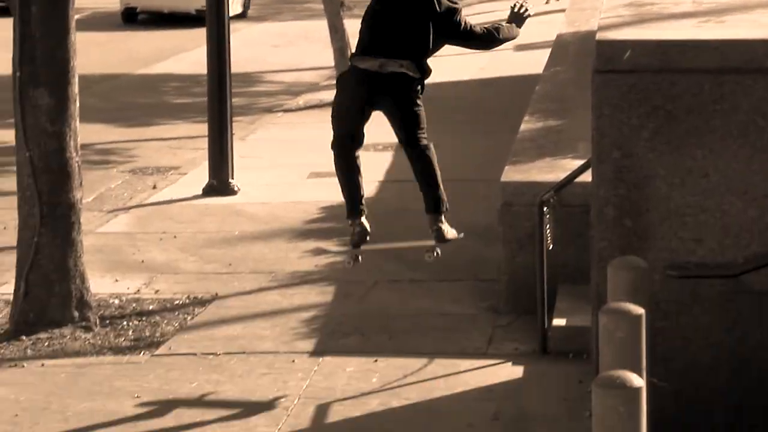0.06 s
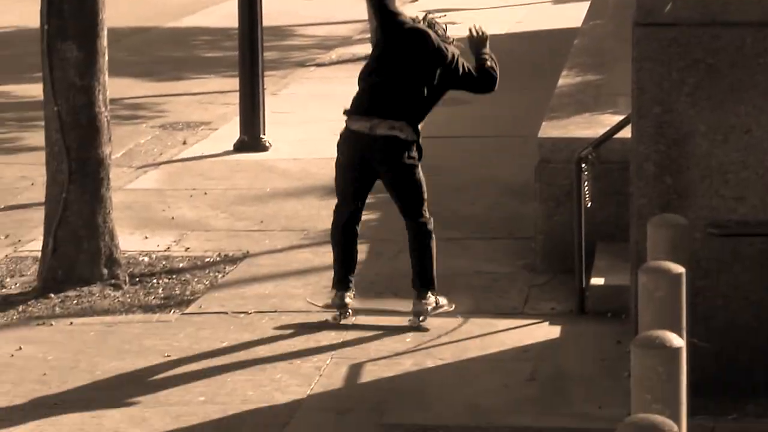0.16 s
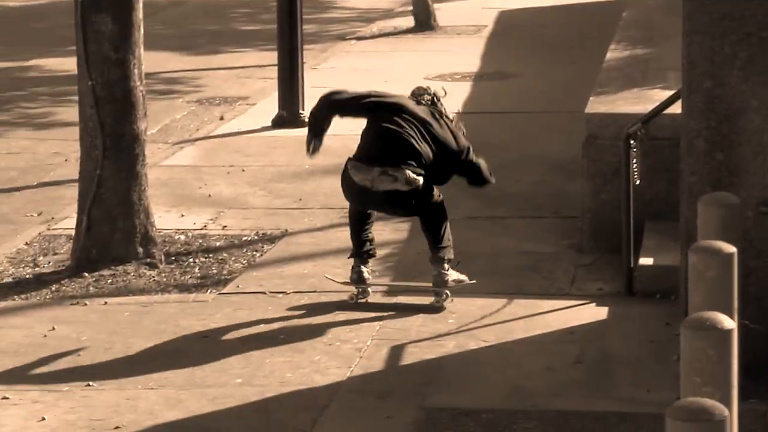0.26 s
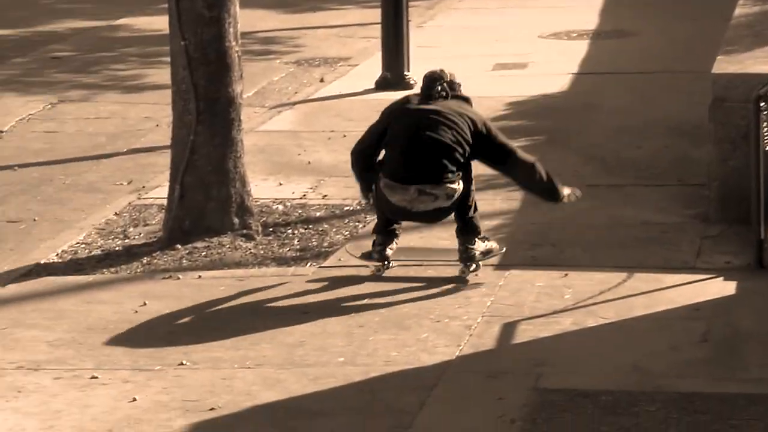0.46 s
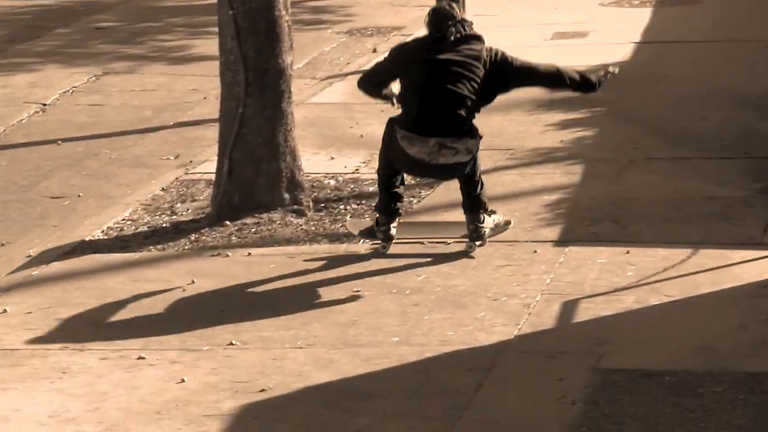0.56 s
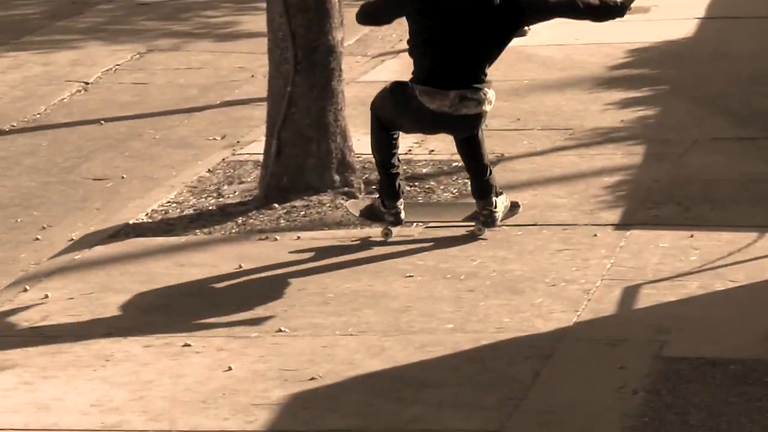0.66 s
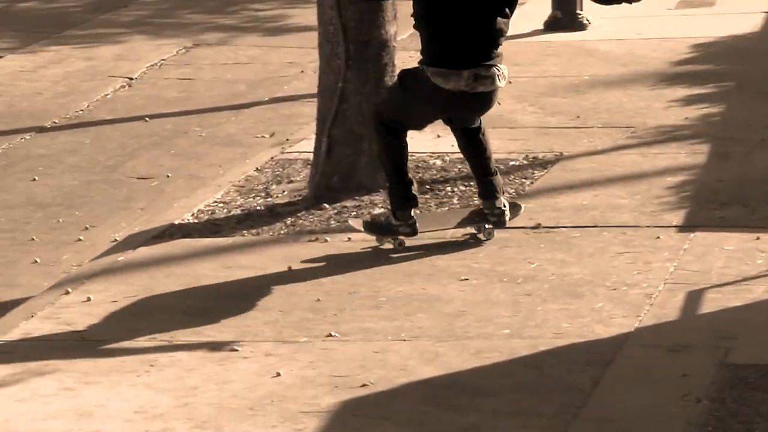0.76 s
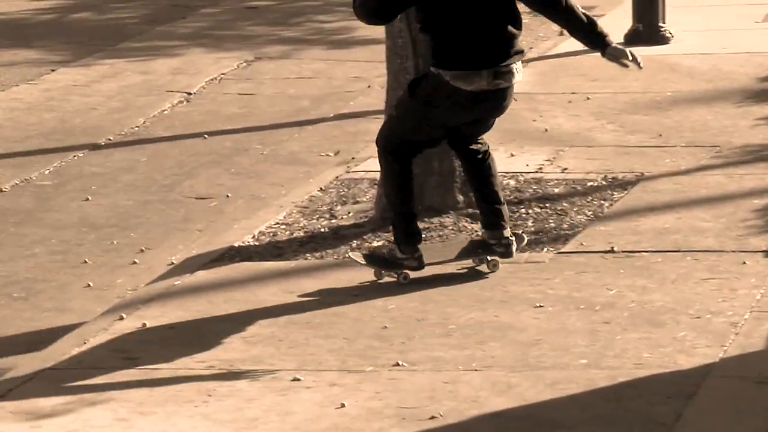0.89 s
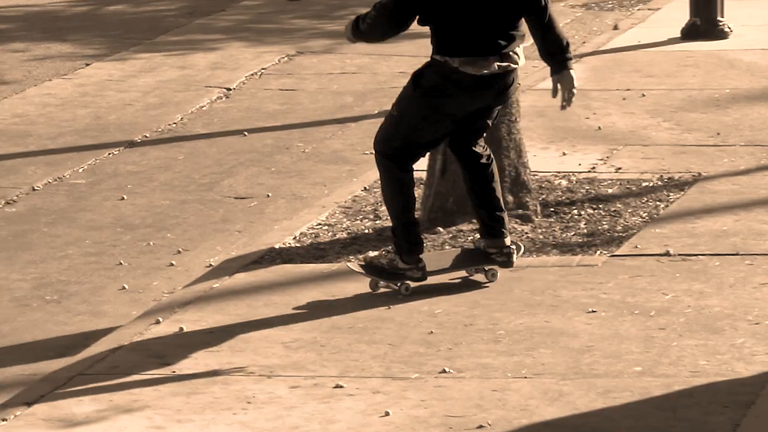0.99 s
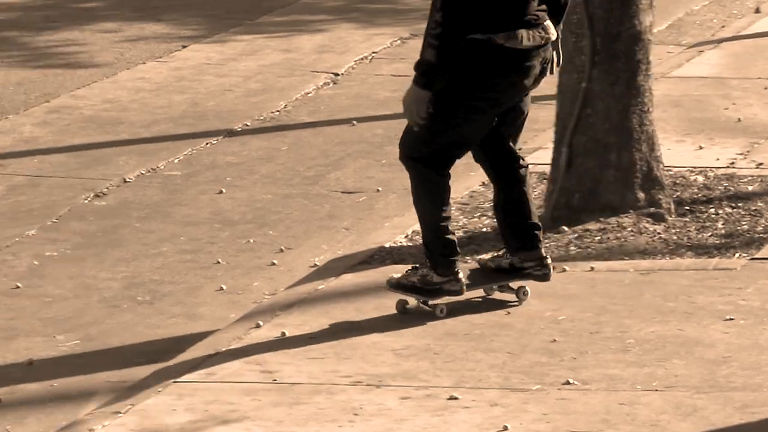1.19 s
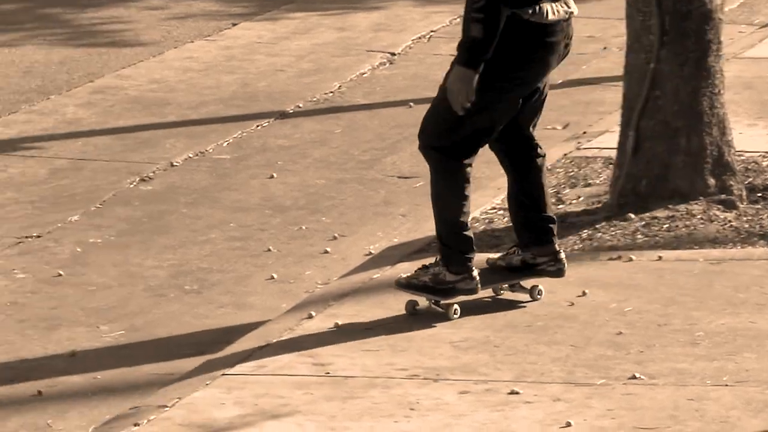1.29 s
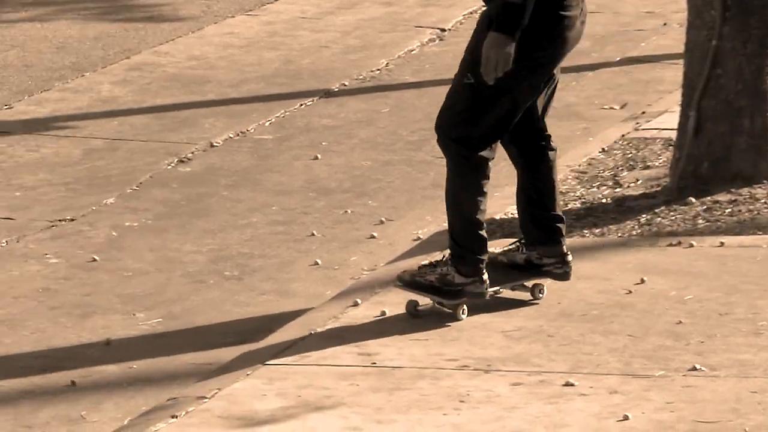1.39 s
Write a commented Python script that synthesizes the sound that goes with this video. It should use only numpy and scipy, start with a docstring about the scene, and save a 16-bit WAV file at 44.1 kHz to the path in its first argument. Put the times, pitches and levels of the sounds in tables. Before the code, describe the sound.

A skateboard landing on stone pavement: after a quarter second of dull distant traffic, wheels, trucks and shoes hit the wooden deck in a loud rattling clack at 0.24-0.29 seconds. Ground and house fronts throw back a short scattered echo. Wheels scrub roughly, strongest near 0.39, then roll on low and soft, with faint metal ticks and a small knock near 0.88. Faint microphone hiss stays throughout.

```python
"""Skateboard landing on a stone pavement

Stereo pair in a street. Wheels, trucks and shoes strike the wooden deck within fifty milliseconds: short pushes
into ringing modes, with cracks of noise and small metal ticks. Ledge, ground and house fronts throw back
decaying noise as an echo. The wheels scrub in dense ringing grains and the board rolls on as flickering noise,
ticking and knocking once, over distant traffic and microphone hiss, both banded noise."""
import sys
import numpy as np
from scipy import signal
from scipy.fft import rfft, irfft, next_fast_len
from scipy.io import wavfile

SR = 44100
rng = np.random.default_rng(int(sys.argv[2]) if len(sys.argv) > 2 else 0)


def unload_audio(sound):
    """Save the sound as a 16-bit wav file, at the path given as the first command line argument."""
    columns = np.transpose(np.atleast_2d(sound))
    # keep every value between -1 and 1, then stretch to whole-number steps
    steps = np.round(np.clip(columns, -1, 1) * 32767)
    wavfile.write(sys.argv[1], SR, steps.astype(np.int16))


def voltage_ratio(level):
    """Linear amplitude factor for a level in decibels (scalar or array-like)."""
    return 10 ** (np.asarray(level, float) / 20)


N = 63945


def rms_one(x):
    """Scale to rms 1."""
    return x / np.sqrt(np.mean(x ** 2) + 1e-20)


def at_hz(points, hz):
    """Read a table's second column on a log-frequency axis."""
    table_hz, values = np.transpose(points)
    return np.interp(np.log(hz), np.log(table_hz), values)


def filtered(x, order, hz, kind="low"):
    """Butterworth filter: a lowpass, or a band between two frequencies."""
    return signal.sosfilt(signal.butter(order, hz, kind, fs=SR, output="sos"), x)


def drift(rate_hz):
    """Slow chance with spread 1: noise through two equal lowpass poles, made at a fortieth of the sample rate."""
    pole = np.exp(-2 * np.pi * rate_hz * 40 / SR)
    chance = rng.standard_normal(N // 40 + 2002)
    slow = signal.lfilter([1], [1, -2 * pole, pole * pole], chance)[2000:]  # settled part
    return np.interp(np.arange(N) / 40, np.arange(len(slow)), rms_one(slow))


def ring(clicks, hz, t60):
    """A damped resonance: each unit click starts a sine of height 1 that falls 60 dB in t60 seconds."""
    radius = voltage_ratio(-60 / (t60 * SR))
    angle = 2 * np.pi * hz / SR
    return signal.lfilter([0, np.sin(angle)], [1, -2 * radius * np.cos(angle), radius ** 2], clicks + 1e-18)


def fade(clicks, t60):
    """Exponential loss: each click starts an envelope that falls 60 dB in t60 seconds."""
    return signal.lfilter([1], [1, -voltage_ratio(-60 / (t60 * SR))], clicks + 1e-18)


# How alike the two microphones hear a diffuse sound.
# Each row: frequency in Hz, left-right correlation from 0 to 1.
LIKENESS = [(60, 1.0), (180, 1.0), (550, 0.99), (1650, 0.83), (4970, 0.08), (15000, 0.091)]


def stereo_bands():
    """Half-octave noise bands: a shared mid and an opposed side give the pair's left-right likeness."""
    edges = 20 * 2 ** np.arange(0, 10, 0.5)  # Hz
    white = rng.standard_normal((2, 2, N + 4000))
    for k, (low, high) in enumerate(zip(edges, edges[1:])):
        # Neighbouring bands use different noise; the filter's start is dropped.
        mid, side = filtered(white[k % 2], 2, [low, high], "band")[:, 4000:]
        centre = np.sqrt(low * high)
        alike = np.clip(at_hz(LIKENESS, centre), 0, 1)
        yield centre, np.sqrt(1 + alike) * mid + np.sqrt(1 - alike) * side * [[1], [-1]]


def noise(spectrum, patchy_db, rate_hz):
    """Coloured stereo noise at rms 1, its bands flickering partly together and mostly each alone."""
    together = drift(rate_hz)
    total = 0
    for hz, band in stereo_bands():
        flicker_db = patchy_db * (0.31 * together + drift(rate_hz))
        total = total + voltage_ratio(at_hz(spectrum, hz) + flicker_db) * band
    return rms_one(total)


# Distant traffic at the microphones.
# Each row: frequency in Hz, relative level in dB per Hz.
TRAFFIC = [(20, -5.5), (40, -3), (70, -1.5), (120, -3), (260, -3), (400, -9.5), (700, -10), (1000, -20.5),
           (1600, -21), (2500, -37.5), (3600, -75.5), (5000, -36), (9000, -103)]


def traffic():
    """Distant traffic: dark noise with a slight flicker in its bands."""
    return voltage_ratio(-35.5) * noise(TRAFFIC, patchy_db=0.5, rate_hz=8)


# Hiss of the microphones themselves.
# Each row: frequency in Hz, relative level in dB per Hz.
HISS = [(2060, -25), (3500, -14), (5080, -16.5), (15200, -12.5), (16100, -17), (16700, -48)]


def microphone_hiss():
    """Microphone hiss: faint, mostly high noise with slowly flickering bands."""
    return voltage_ratio(-72) * noise(HISS, patchy_db=0.8, rate_hz=3.8)


# Blows of wheels, trucks and shoes on the board, in the landing and one late knock.
# Each row: start in seconds, relative deck level in dB, contact in ms, relative crack level in dB,
# extra level of the low thump modes in dB.
BLOWS = [(.2400, -16, 1.35, -55, 6), (.2428, -14.5, 0.2, -28.5, -0.5), (0.2456, -2, 0.57, -18.5, -1.5),
         (.2470, -5, 0.52, -24, -3), (.2500, -20.5, 0.64, -38.5, -2.5), (.2543, -14.5, 0.31, -20, 8.5),
         (0.258, -24, 0.17, -37, 7), (0.262, -13, 0.62, -31, 2), (0.2648, -5.5, 0.56, -41.5, 2.5),
         (.2675, -9, 0.5, -29.5, 5.5), (.2710, -5.5, 0.44, -26, 0), (0.278, -14.5, 0.31, -37, 2),
         (.2875, -13.5, 0.33, -35, -1), (.8770, -21, 0.92, -43, -14)]
# Ringing modes of the wooden deck and the trucks.
# Each row: frequency in Hz, relative level in dB, time to fall 60 dB in seconds.
DECK = [(130, -6.5, 0.034), (206, -12, 0.33), (230, -4, 0.039), (541, -21, 0.05), (603, 0, .048),
        (704, -8, 0.045), (1008, -3.5, 0.028), (1140, -18.5, 0.046), (1487, -7.5, 0.056), (1922, -4, 0.02),
        (2380, -22, 0.031), (2816, -11.5, 0.049), (3180, -4.5, 0.03), (4430, -41, .02)]
# Colour of the crack that comes with each blow.
# Each row: frequency in Hz, relative level in dB per Hz.
CRACK = [(500, -11.5), (1000, -2), (1600, -3), (2500, -5), (3500, -13.5), (5000, -20), (6800, -14),
         (9000, -29), (14000, -41), (16500, -47), (19000, -75)]


def deck_modes():
    """Each blow is a smooth push into all modes; a longer contact feeds the high modes less."""
    MODE_SPREAD_DB, THUMP_BELOW_HZ = 1.5, 300
    RADIATES_FROM_HZ, DULL_ABOVE_HZ = 143, 2770
    out = np.zeros(N)
    spread_db = MODE_SPREAD_DB * rng.standard_normal((len(BLOWS), len(DECK)))
    for (hz, mode_db, t60), mode_spread_db in zip(DECK, spread_db.T):
        force = np.zeros(N)
        for (s, blow_db, contact_ms, _, thump_db), own_db in zip(BLOWS, mode_spread_db):
            start = int(s * SR)
            quarter_contact = contact_ms * SR / 4000  # samples
            age = (np.arange(400) + 1 - s * SR % 1) / quarter_contact
            push = age ** 2 * np.exp(-1.5 * age)
            level_db = blow_db + mode_db + own_db + thump_db * (hz < THUMP_BELOW_HZ)
            force[start:start + 400] -= voltage_ratio(level_db) * push / push.sum()
        out += ring(force, hz, t60)
    return filtered(out, 2, [RADIATES_FROM_HZ, DULL_ABOVE_HZ], "band")


def cracks():
    """Each blow also sets off a burst of noise, bright and short over a duller, longer tail."""
    SIDE_DB, BRIGHT_T60_S = -12.5, 0.018
    TAIL_DB, TAIL_T60_S, TAIL_CUT_HZ = -8.5, 0.086, 5600
    starts = np.zeros(N)
    for s, _, _, crack_db, _ in BLOWS:
        starts[int(s * SR)] = voltage_ratio(crack_db)
    starts = signal.lfilter([0.2], [1, -0.8], starts)  # softens the onsets
    first, second = noise(CRACK, patchy_db=0, rate_hz=10)
    bright = first + voltage_ratio(SIDE_DB) * second * [[1], [-1]]  # narrow stereo
    dull = filtered(bright, 2, TAIL_CUT_HZ)
    return fade(starts, BRIGHT_T60_S) * bright + voltage_ratio(TAIL_DB) * fade(starts, TAIL_T60_S) * dull


def board():
    """The struck board: ringing deck modes and the cracks of the same blows."""
    return deck_modes() + cracks()


# How long the house fronts keep each band alive.
# Each row: frequency in Hz, time to fall 60 dB in seconds.
FRONTS_T60 = [(100, 0.45), (600, 0.86), (2000, 1), (5000, 0.63), (12000, 0.15)]
# Colour of what the house fronts send back.
# Each row: frequency in Hz, relative level in dB.
FRONTS_COLOUR = [(100, -3.5), (250, 7), (420, 7), (600, -6.5), (850, 5.5), (1200, 1), (2200, -1.5),
                 (3500, -2.5), (6500, -0.5), (9000, -12.5), (15000, -21)]


def street(x):
    """Scattered echo: a quick return from ledge and ground, then a swell from the house fronts dying by band."""
    NEAR_DB, NEAR_T60_S = -15, 0.1
    FRONTS_DB, DELAY_S, RISE_S, HOLD_S = -17.5, 0.041, 0.022, 0.016
    CUT_HZ = 8500
    t = np.arange(N) / SR
    late = t - DELAY_S
    swell = np.clip(late / RISE_S, 0, 1)
    near, fronts = 0, 0
    for hz, band in stereo_bands():
        near = near + band * voltage_ratio(-60 * t / NEAR_T60_S)
        dying_db = -60 * np.maximum(late - RISE_S - HOLD_S, 0) / at_hz(FRONTS_T60, hz)
        fronts = fronts + band * swell * voltage_ratio(at_hz(FRONTS_COLOUR, hz) + dying_db)
    answer = (voltage_ratio(NEAR_DB) * rms_one(near) + voltage_ratio(FRONTS_DB) * rms_one(fronts)) / np.sqrt(N)
    answer = filtered(answer, 4, CUT_HZ)
    size = next_fast_len(2 * N)
    return irfft(rfft(x, size) * rfft(answer, size), size)[:, :N]  # convolution


# Wheels rolling on stone.
# Each row: frequency in Hz, relative level in dB per Hz.
ROLL = [(50, -46), (100, 4.5), (200, -4.5), (400, -13.5), (700, -14.5), (1200, -13), (2000, -21),
        (3200, -60), (5000, -37), (7000, -69), (10000, -74)]


def rolling():
    """Wheels on stone: flickering low noise that rises as the rolling begins, then stays."""
    FROM_S, RISE_S = 0.25, 0.1
    rise = np.clip((np.arange(N) / SR - FROM_S) / RISE_S, 0, 1)
    return voltage_ratio(-40) * rise * noise(ROLL, patchy_db=0.8, rate_hz=20)


# Small metal ticks of the trucks.
# Each row: start in seconds, relative level in dB, frequency in Hz.
TICKS = [(0.2536, -25, 5420), (0.6595, -64, 5900), (.755, -54.5, 6170), (.837, -48.5, 6200),
         (.9304, -62, 4400), (1.014, -59, 5030), (1.186, -58.5, 6630)]


def ticks():
    """Small metal parts of the trucks: short high rings, each with a snap of noise lasting twice as long."""
    T60_S, SNAP_DB = 0.011, 2.0
    out = np.zeros(N)
    snap_noise = filtered(rng.standard_normal(N), 2, (3000, 7500), "band")
    for s, db, hz in TICKS:
        click = np.zeros(N)
        click[int(s * SR)] = voltage_ratio(db)
        snap = voltage_ratio(SNAP_DB) * fade(click, T60_S * 2) * snap_noise
        out += ring(click, hz, T60_S) + snap
    return out


# Wheels scrubbing the stone while the rider's weight sinks in.
# Each row: time in seconds, level in dB.
SCRUB = [(.29, -48), (.33, -34), (.365, -30), (.39, -27.5), (.405, -36.5), (.43, -43), (.52, -43)]


def scrub():
    """Wheels scrubbing stone: dense uneven grains at random moments, each ringing a few cycles."""
    GRAINS_PER_S, LOW_HZ, HIGH_HZ, CYCLES, CUT_HZ = 2000, 850, 1700, 7.0, 3000
    sizes = voltage_ratio(3.0 * np.minimum(rng.exponential(1, N), 4)) * rng.choice([-1, 1], N)
    sizes = sizes * (rng.random(N) < GRAINS_PER_S / SR)
    pitches = np.geomspace(LOW_HZ, HIGH_HZ, 14)
    dealt = rng.integers(0, 14, N)  # which pitch each grain takes
    grains = sum(ring(sizes * (dealt == k), hz, CYCLES / hz) for k, hz in enumerate(pitches))
    grains = filtered(grains, 2, CUT_HZ)
    s, db = np.transpose(SCRUB)
    level_db = np.interp(np.arange(N) / SR, s, db, left=-120, right=-120)
    return voltage_ratio(level_db) * rms_one(grains)


def scene():
    """Board and ticks with their echo, scrub, rolling and traffic, a touch to the right; hiss on top."""
    hits = board() + ticks()
    echo = street(hits.mean(axis=0))
    outdoors = hits + echo + scrub() + rolling() + traffic()
    balance = voltage_ratio([[0.35], [-0.35]])[::-1]  # left lower, right higher
    return outdoors * balance + microphone_hiss()


def top_cut(x):
    """Nothing passes above the cut-off."""
    return signal.sosfilt(signal.butter(12, 16890, fs=SR, output="sos"), x)


def record(dry):
    """Any swing beyond full scale is cut flat at the ceiling."""
    mix = np.clip(dry, -1, 1)
    return top_cut(mix)


dry = scene()
out = record(dry)
unload_audio(out)
```